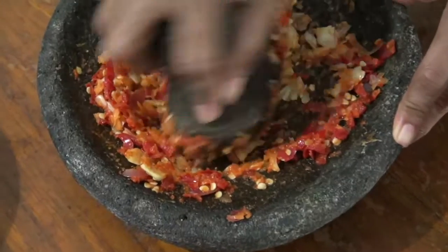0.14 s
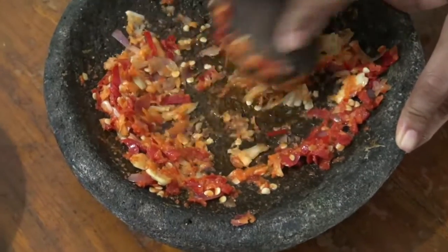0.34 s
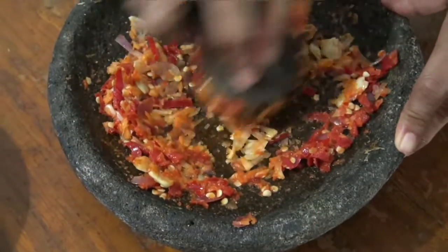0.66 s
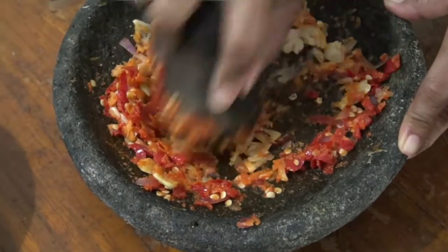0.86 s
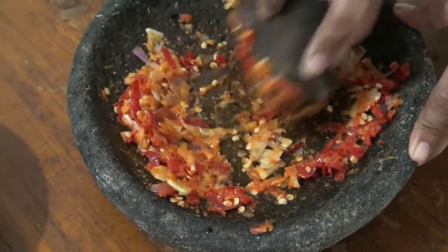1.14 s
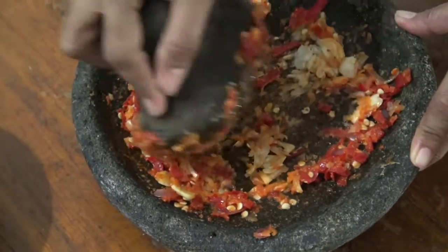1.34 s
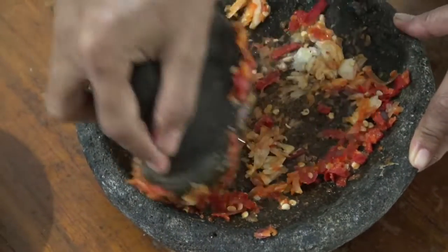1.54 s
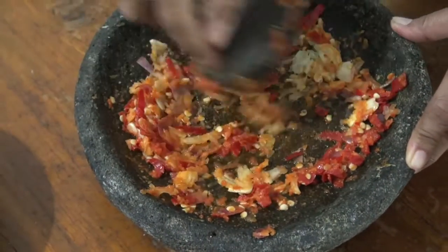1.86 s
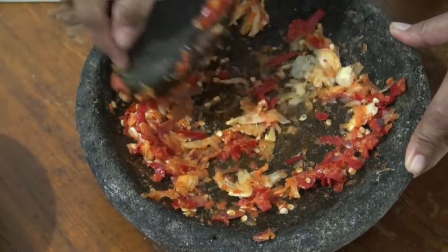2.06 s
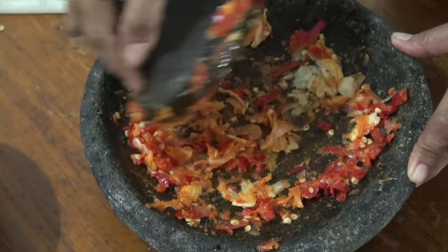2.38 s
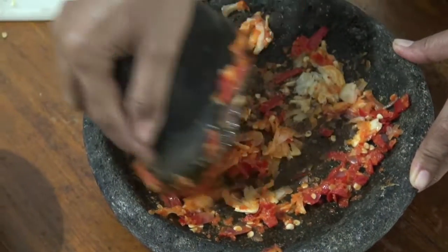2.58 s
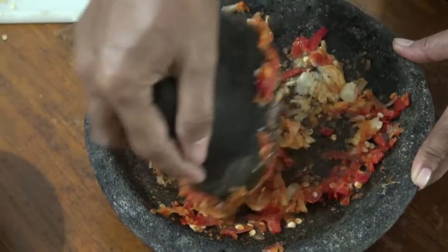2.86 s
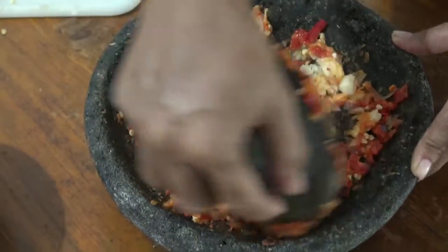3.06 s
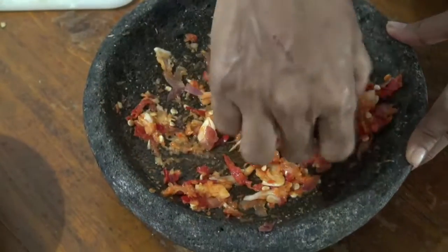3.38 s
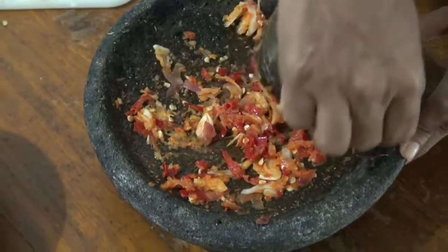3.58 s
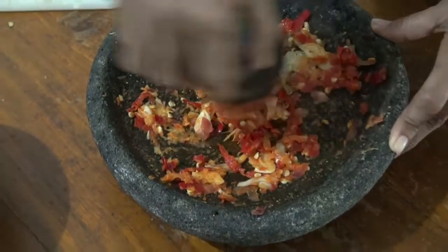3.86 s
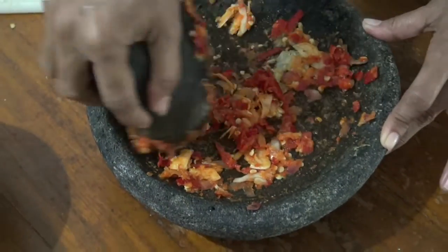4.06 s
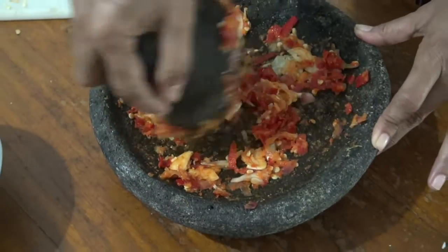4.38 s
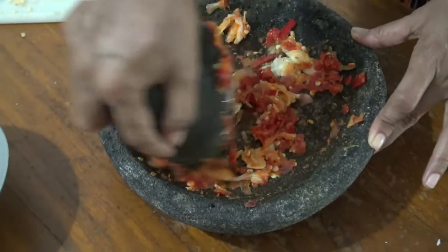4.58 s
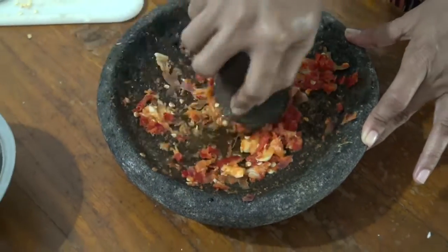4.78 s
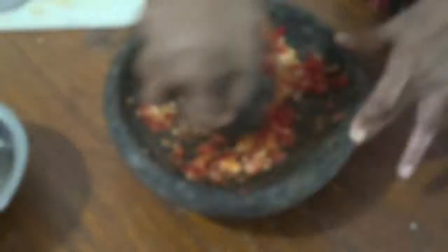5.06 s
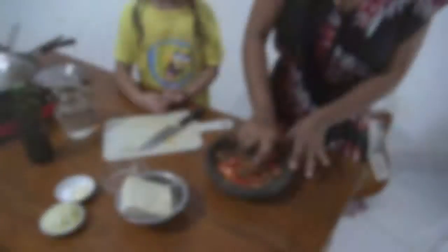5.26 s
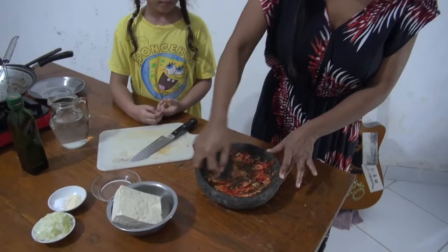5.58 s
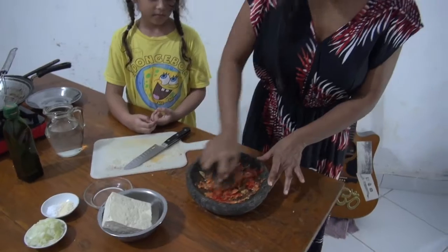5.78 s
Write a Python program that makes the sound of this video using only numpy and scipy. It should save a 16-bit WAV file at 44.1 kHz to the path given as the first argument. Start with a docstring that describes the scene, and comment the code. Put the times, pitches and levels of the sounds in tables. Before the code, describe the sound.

Sharp stone knocks, wet gritty crunching and short pestle clacks come in bursts as spice paste is ground in a reverberant tiled room.

```python
"""A hard knock and its bounces open the scene: a stone pestle works in a stone mortar on a wooden table.
Each blow is a noise chatter of some milliseconds, coloured as knock, thud and crack, that rings bowl modes.
Wet chilli, garlic and seeds crunch, snap and sizzle as coloured grains; stone rumbles; clacks ring the pestle.
Hard tiled walls add a long noise tail. A fan-like whirr, soft hiss and thin tones stay underneath."""
import sys
import numpy as np
from scipy import signal
from scipy.fft import rfft, irfft
from scipy.io import wavfile
from scipy.ndimage import uniform_filter1d

SR = 44100
rng = np.random.default_rng(int(sys.argv[2]) if len(sys.argv) > 2 else 0)


def generate_wav(signal):
    """Clip the signal to [-1, 1] and save it as 16-bit WAV at the path in sys.argv[1]."""
    frames = np.transpose(np.atleast_2d(signal))
    scaled = np.clip(frames, -1, 1) * 32767
    pcm = np.round(scaled).astype(np.int16)
    wavfile.write(sys.argv[1], SR, pcm)


N = 261160
FIRST_TOUCH_S, FIRST_TOUCH = 0.0005, 0.31  # first contact above the chatter: decay, relative height


def from_db(db):
    """Decibels to gain."""
    return 10 ** (np.asarray(db) / 20)


def rms_one(x):
    """Scale to rms 1."""
    return x / np.sqrt(np.mean(x ** 2) + 1e-20)


def at_hz(points, hz):
    """Read (Hz, value) rows on a log-frequency axis."""
    points = np.array(points)
    return np.interp(np.log(hz), np.log(points[:, 0]), points[:, 1])


def colour(x, spectrum):
    """Minimum-phase filter by the folded cepstrum; unit-energy taps keep the rms of white noise."""
    size = 2048
    hz = np.arange(size // 2 + 1) * SR / size + 10
    log_gain = at_hz(spectrum, hz) * np.log(10) / 20
    cepstrum = irfft(log_gain)
    cepstrum[1:size // 2] *= 2
    cepstrum[size // 2 + 1:] = 0
    taps = irfft(np.exp(rfft(cepstrum)))
    return signal.oaconvolve(x, taps / np.sqrt(np.sum(taps ** 2)))[:len(x)]


def drift(rate_hz):
    """Random wander: straight lines between normal draws of spread 1."""
    steps = rng.standard_normal(400)
    return np.interp(np.arange(N) / SR * rate_hz, np.arange(400), steps)


def ring(x, hz, t60_s):
    """One decaying mode as a two-pole resonator; a unit click rings with height about 1."""
    radius = from_db(-60 / (max(t60_s, .001) * SR))
    angle = 2 * np.pi * hz / SR
    return signal.lfilter([0, np.sin(angle)], [1, -2 * radius * np.cos(angle), radius ** 2], x + 1e-18)


def swell(x, hz, build_s, t60_s):
    """A mode fed by a shorter one builds up without a wide click; height about 1."""
    return ring(ring(x, hz, build_s), hz, t60_s) * 2 * np.log(1000) / (build_s * SR)


def soften(rings):
    """A contact lasts a fraction of a millisecond: band limits keep the ringing free of a wide click."""
    return signal.sosfilt(signal.butter(2, [1600, 12500], "band", fs=SR, output="sos"), rings)


def chatter(count, decay_s, touch):
    """Rough stone faces meet in a dying run of contacts; returns the run and its envelope's rms."""
    t = np.arange(count) / SR
    rise = np.minimum(t / 0.00013, 1)
    fall = np.exp(-t / max(decay_s, .0005)) + touch * np.exp(-t / FIRST_TOUCH_S)
    shape = rise * fall
    return rng.standard_normal(count) * shape, np.sqrt(np.mean(shape ** 2))


def grit(per_s, uneven_db):
    """Random clicks of very uneven size, rms 1."""
    sizes = from_db(uneven_db * np.minimum(rng.exponential(1, N), 5))
    signed = sizes * rng.choice([-1, 1], N)
    return rms_one(signed * (rng.random(N) < per_s / SR))


# Blows and bounces on the bowl. Each row: start in seconds, then relative levels in dB of
# knock, table thud, bright crack and bowl ring.
BLOWS = [(0.001, 1.5, -16, 0, -5), (0.019, -9, -34, -3, -27), (0.044, -10, -11, -6.5, -22),
         (0.069, -4, -18.5, -25, -38), (0.099, -13.5, -39, -10.5, -34), (0.378, -8.5, -16.5, -15.5, -51),
         (0.424, -44, -43, -27, -46), (0.76, -15.5, -30, -21, -46), (0.794, -14, -21.5, -19, -44),
         (0.83, -23.5, -17, -33, -50), (0.842, -12.5, -20.5, -22.5, -43), (1.182, -27, -26, -34, -57),
         (1.23, -26.5, -28.5, -34.5, -52), (1.697, -26, -25, -27.5, -53), (2.043, -11.5, -21.5, -12, -61),
         (2.065, -19, -13, -28, -52), (2.498, -3, -17, -8.5, -22), (2.505, -6, -18, -7.5, -20.5),
         (2.539, 0, -6, -23, -46), (2.552, -7.5, -38, -5, -27), (2.993, -60, -49, -35, -60),
         (3.009, -35, -30.5, -34, -59), (3.053, -6.5, -9, -5, -47), (3.077, -9.5, -28, -27, -39),
         (3.116, -9.5, -13, -14, -47), (3.129, -28, -9, -22, -41), (3.16, -15, -41, -23, -40),
         (3.236, -12, -19, -19, -49), (3.644, -41.5, -30, -39, -50), (4.041, -11, -21, -9.5, -46),
         (4.046, -5, -16, -14.5, -22), (4.068, -13.5, -51, -19, -36), (4.149, -19, -30, -28, -50),
         (4.157, -10, -12.5, -18, -40), (4.208, -30, -18, -38, -56), (4.505, -31, -29, -31, -57),
         (4.516, -24.5, -22, -31, -55), (4.546, -2, -9.5, -7.5, -45), (4.555, 0, -10, -30, -20),
         (4.579, -13, -7.5, -12.5, -44), (5.057, -30, -21, -37, -57), (5.202, -21.5, -23, -26.5, -58),
         (5.235, -26.5, -23.5, -46, -41), (5.262, -15, -21, -19.5, -40), (5.301, -19, -50, -24, -31),
         (5.515, 1.5, -10.5, -16, -14.5), (5.523, 1, -18, 1.5, -7), (5.551, -4, -9.5, -3, -32),
         (5.574, -4, -11, 0, -23), (5.6, -5.5, -17, -25, -28), (5.629, -18, -30, -9.5, -36),
         (5.89, -21.5, -25, -26, -46)]
# Spectra of stone knock, table thud and bright crack. Each row: frequency in Hz, relative density in dB per Hz.
KNOCK = [(300, -23), (600, -5), (800, 4), (1300, -1), (1700, -1.5), (2600, -8.5), (5000, -53.5),
         (15000, -97.5)]
THUD = [(100, -49), (150, -5.5), (200, -9.5), (330, 4.5), (580, 5), (800, 11.5), (1500, -30), (15000, -100)]
CRACK = [(100, -58.5), (800, -24), (1500, 5.5), (2200, 5.5), (3000, -3), (3800, -13), (5500, -24.5),
         (8000, -36.5), (15000, -68)]
# Bowl modes. Each row: frequency in Hz, relative level in dB, 60 dB decay in seconds.
BOWL = [(2150, -7, 0.21), (4470, -8, 0.12), (4890, -10, 0.019), (5600, -19, 0.076), (6850, -18, 0.03)]
BLOW_CHATTER_S = 0.0085
BOUNCE_WITHIN_S = 0.06  # a blow this soon after another is a bounce
BOUNCE_CHATTER_S, BOUNCE_TOUCH = 0.011, 0.033  # a bounce skids: longer chatter, hardly any first contact


def blows():
    """One chatter sounds as knock, thud and crack, its start rings the bowl; returns close and room feeds."""
    count = 4000
    close, far, strikes = np.zeros((3, N + count))
    gaps_s = np.diff([row[0] for row in BLOWS], prepend=-1)
    for (s, knock_db, thud_db, crack_db, bowl_db), gap_s in zip(BLOWS, gaps_s):
        bounce = gap_s < BOUNCE_WITHIN_S
        contact = (BOUNCE_CHATTER_S, BOUNCE_TOUCH) if bounce else (BLOW_CHATTER_S, FIRST_TOUCH)
        at = round(s * SR)
        rough, size = chatter(count, *contact)
        parts = (KNOCK, knock_db), (THUD, thud_db), (CRACK, crack_db)
        blow = size * sum(from_db(db) * rms_one(colour(rough, spectrum)) for spectrum, db in parts)
        close[at:at + count] += blow
        # heavy blows shake the whole table top, which fills the room more
        far[at:at + count] += from_db(-4.5 + 0.2 * knock_db) * blow
        strikes[at] = from_db(bowl_db)
    modes = sum(from_db(db) * swell(strikes, hz, 0.0033, t60_s) for hz, db, t60_s in BOWL)
    rings = soften(modes)
    return (close + rings)[:N], (far + from_db(-2.5) * rings)[:N]


# Room decay. Each row: frequency in Hz, 60 dB decay in seconds.
ROOM = [(125, 0.59), (250, 0.23), (500, 0.59), (1000, 0.75), (2000, 0.72), (4000, 0.75), (8000, 0.54),
        (14000, 0.24)]


def walls(x):
    """Dense echoes build up in a few ms, die band by band; a new pattern each half second as the pestle moves."""
    t, step = np.arange(SR) / SR, SR // 2
    edges_hz = np.geomspace(70, 18000, 13)
    white = rng.standard_normal((2, N // step + 1, SR))
    tails = 0
    for k, (low, high) in enumerate(zip(edges_hz, edges_hz[1:])):
        band = signal.sosfilt(signal.butter(2, [low, high], "band", fs=SR, output="sos"), white[k % 2])
        t60_s = at_hz(ROOM, np.sqrt(low * high))
        tails = tails + band * from_db(-60 * t / t60_s)
    tails = tails * np.clip((t - .006) / 0.004, 0, 1)
    out = np.zeros(N + 2 * SR)
    for k, tail in enumerate(tails):
        start = k * step
        echo = signal.fftconvolve(x[start:start + step], tail / np.sqrt(np.sum(tail ** 2)))
        out[start:start + len(echo)] += echo
    return out[:N]


# Hiss spectrum. Each row: frequency in Hz, relative density in dB per Hz.
AIR = [(25, -23), (50, -9), (100, -5.5), (150, -1.5), (250, -2.5), (500, -4.5), (800, -25), (1400, -10),
       (2400, -17), (3200, -15), (5000, -18), (8000, -20.5), (12000, -31.5), (15700, -24)]
# Whirr resonances. Each row: centre in Hz, width in Hz, rms level in dB.
WHIRR = [(567.5, 36, -54), (1104, 40, -62.5), (1122, 95, -48.5)]
# Thin steady tones. Each row: frequency in Hz, peak level in dB.
WHINE = [(9152, -79), (12000, -86), (13700, -77), (15000, -95)]
AIR_DB = -52.5


def background():
    """Soft coloured hiss, air whirring as noise in a few resonances, and thin high sines."""
    out = from_db(AIR_DB) * colour(rng.standard_normal(N), AIR)
    for hz, width_hz, db in WHIRR:
        edges_hz = [hz - width_hz / 2, hz + width_hz / 2]
        band = signal.butter(2, edges_hz, "band", fs=SR, output="sos")
        out += from_db(db) * rms_one(signal.sosfilt(band, rng.standard_normal(N)))
    for hz, db in WHINE:
        out += from_db(db) * np.sin(2 * np.pi * hz * np.arange(N) / SR)
    return out


# Strokes of the pestle through the paste. Each row: hardest moment, build-up and easing-off in seconds,
# then relative levels in dB of wet crunch, sizzle of juice and stone rumble.
STROKES = [(0.085, 0.12, 0.23, -29, -44, -49), (0.311, 0.07, 0.072, -29, -43.5, -44),
           (0.405, 0.031, 0.27, -29.5, -50, -51), (0.691, .13, 0.066, -33, -43, -54.5),
           (0.79, 0.05, 0.27, -29, -44, -31), (1.049, 0.15, 0.11, -30.5, -44, -44),
           (1.17, 0.086, 0.17, -36, -42, -42.5), (1.245, 0.14, 0.12, -49, -72, -43.5),
           (1.65, 0.13, 0.17, -35.5, -47, -47), (2.135, 0.11, 0.21, -38.5, -48, -35.5),
           (2.545, 0.014, 0.27, -35, -70, -55), (3.08, .12, 0.21, -40.5, -49, -30),
           (3.21, 0.18, 0.22, -38, -45.5, -27.5), (3.592, 0.017, 0.31, -41, -50, -52),
           (4.12, 0.07, 0.24, -40.5, -58, -35), (4.56, 0.03, 0.24, -34, -54, -34),
           (4.67, 0.07, 0.053, -36, -59, -34), (4.81, .1, 0.17, -45.5, -51, -45),
           (4.855, 0.015, 0.037, -42.5, -64, -45), (5.085, 0.012, 0.065, -45, -73, -41),
           (5.13, .03, 0.013, -35, -69, -42), (5.205, 0.029, 0.024, -39, -60, -48),
           (5.28, .25, 0.29, -38, -59, -35), (5.64, 0.16, 0.16, -35, -57, -56),
           (5.75, 0.037, 0.22, -34.5, -61, -47)]
STROKE_SWING_DB = 26.5  # crunch changes this much per build-up or easing-off time
SIZZLE_SWING, RUMBLE_SWING = 2.34, 0.92  # ratios to the crunch's swing
RESTING_DB = -80.5, -65.5, -53  # crunch, sizzle, rumble while the pestle only leans on the paste


def strokes():
    """Every stroke swells to its hardest moment and eases off; returns gains of crunch, sizzle and rumble."""
    t = np.arange(N) / SR
    gains = from_db(RESTING_DB)[:, None] * np.ones(N)
    swing_db = STROKE_SWING_DB * np.array([[1], [SIZZLE_SWING], [RUMBLE_SWING]])
    for s, build_s, ease_s, *levels_db in STROKES:
        away = np.where(t < s, (s - t) / max(build_s, .005), (t - s) / max(ease_s, .005))
        gains += from_db(np.array(levels_db)[:, None] - swing_db * away)
    return gains


SMALL_SNAPS_PER_S, SMALL_SNAPS_DB, SMALL_SNAPS_UNEVEN_DB = 350, -4.5, 2.8  # dB: relative to the crunch


def small_snaps():
    """Sparse clicks, each ringing a few cycles at one of a dozen pitches; rms 1."""
    clicks = grit(SMALL_SNAPS_PER_S, SMALL_SNAPS_UNEVEN_DB)
    dealt = rng.integers(0, 12, N)
    pitches_hz = np.geomspace(2600, 7000, num=12)
    rings = (swell(clicks * (dealt == k), hz, 6.2 / hz, 17.0 / hz) for k, hz in enumerate(pitches_hz))
    return rms_one(sum(rings))


# Spectra of wet crunch, juice sizzle and stone rumble. Each row: frequency in Hz, relative density in dB per Hz.
CRUNCH = [(900, -11), (1500, -9), (2300, -1), (3400, -3), (5000, 1), (6600, -4), (9000, -11), (11000, -27),
          (15000, -39)]
SIZZLE = [(6000, -44), (9500, -4), (11500, -1.5), (13500, -8), (15700, -5)]
RUMBLE = [(100, -10), (200, 3.5), (500, 2.5), (1000, 7), (2000, -9), (4000, -30.5), (15000, -57)]


def drag():
    """Paste and seeds crunch in clumps under the pestle while stone rumbles on stone."""
    crunch_gain, sizzle_gain, rumble_gain = strokes()
    grains = grit(3500, 1.77) * from_db(2.42 * drift(65.))
    bumps = grit(2500, 2.33) * from_db(2.6 * drift(40.))
    crunch = colour(grains, CRUNCH) + from_db(SMALL_SNAPS_DB) * small_snaps()
    sizzle, rumble = colour(grains, SIZZLE), colour(bumps, RUMBLE)
    return crunch_gain * crunch + sizzle_gain * sizzle + rumble_gain * rumble


# Loudest seeds and skins snapping. Each row: start in seconds, relative peak in dB, pitch in Hz.
SNAPS = [(0.0337, 0, 4470), (0.082, 0, 4000), (0.0897, -13, 3080), (0.131, -11, 4500), (0.2706, -11, 4560),
         (0.295, -10.5, 4354), (0.3152, -3.5, 5700), (0.392, -12, 4740), (0.424, -7, 3080),
         (0.4454, -12, 3570), (0.455, -11, 2650), (0.5058, -17.5, 5640), (0.623, -20, 4890),
         (0.643, -19, 4860), (0.667, -23, 4440), (0.697, -21, 3780), (0.7677, -19, 4400),
         (0.7944, -5, 3300), (0.8668, -10, 3270), (0.916, -13.5, 3700), (0.983, -17, 4340),
         (1.0177, -17, 4760), (1.043, -27, 4490), (1.052, -13, 5110), (1.07, -16, 2600), (1.078, -20, 4800),
         (1.161, -15.5, 4890), (1.17, -19, 8500), (1.239, -19, 3940), (1.253, -12.5, 4770),
         (1.6077, -30, 4910), (1.642, -15, 6800), (1.6636, -21, 7160), (1.6896, -23, 5190),
         (2.5012, -14, 4470), (2.599, -27, 7500), (3.5758, -27, 9900), (3.6007, -37, 6600),
         (4.04, -17.5, 9400), (4.129, -21, 7500), (4.6574, -11.5, 4830), (4.677, -20.5, 5000),
         (4.785, -23.5, 4090), (4.81, -16, 4070), (5.0824, -27, 6600), (5.128, -28, 4040),
         (5.1683, -21, 5600), (5.203, -22, 4460), (5.2675, -22, 6870), (5.676, -16.5, 4450),
         (5.7482, -20, 6660), (5.77, -15.5, 3250)]


def snaps():
    """Each snap is a few cycles at its own pitch plus a wide crack."""
    count = 400
    out, t = np.zeros(N + count), np.arange(count) / SR
    cracks = rng.standard_normal((len(SNAPS), count))
    for (s, db, hz), crack in zip(SNAPS, cracks):
        at = round(s * SR)
        pitched = 0.12 * ring(crack * np.exp(-t / 0.0023), hz, 5.5 / hz)
        snap = pitched + 0.34 * crack * np.exp(-t / 0.00018)
        out[at:at + count] += from_db(db) * snap / np.abs(snap).max()
    return signal.sosfilt(signal.butter(3, [1800, 9000], "band", fs=SR, output="sos"), out[:N])


def clear_ring(x, modes):
    """Swelling modes, each set by rms, with little sound between them."""
    return sum(from_db(db) * rms_one(swell(x, hz, 0.0035, t60_s)) for hz, db, t60_s in modes)


# Glancing clacks. Each row: start in seconds, relative peak of the lowest modes in dB,
# peak of the upper modes against the lowest in dB.
CLACKS = [(1.514, -40, 1), (1.623, -33, -9), (2.036, -17.5, -13), (2.042, -12, -18), (2.049, -17, -25),
          (2.056, -11, -21), (2.068, -9, -21), (2.075, -27, -24), (2.992, -35.5, 0.5), (3.035, -29, -29),
          (3.052, -0.5, -11), (3.066, -7, -29), (3.076, -11, -5), (3.088, -13, -9), (3.098, -4, -21),
          (3.117, -11.5, -14), (3.139, -22, -2), (3.156, -14, -15), (3.198, -22, -13), (3.229, -18, -18),
          (3.499, -34, -11), (3.561, -43, -25), (3.643, -32, -18), (4.48, -35, -28.5), (5.055, -36, -22.5),
          (5.128, -35, -9), (5.24, -33, -21)]
# Pestle modes, the first three the lowest. Each row: frequency in Hz, relative level in dB, 60 dB decay in seconds.
PESTLE = [(2326, -7, 0.036), (2388, 7, 0.065), (2387, -19.5, .025), (4140, -9, 0.028), (4930, 5, 0.016),
          (7670, -4, 0.015), (10500, -23, 0.03), (12100, -31, .025), (13320, -26, .02)]
CLACK_CHATTER_S = 0.0065


def clacks():
    """A short chatter rings the pestle; sharper contacts reach its upper modes more."""
    count = 3000
    out = np.zeros(N + count)
    for s, db, upper_db in CLACKS:
        at = round(s * SR)
        rough, _ = chatter(count, CLACK_CHATTER_S, FIRST_TOUCH)
        lowest = clear_ring(rough, PESTLE[:3])
        upper = clear_ring(rough, PESTLE[3:])
        both = lowest / np.abs(lowest).max() + from_db(upper_db) * upper / np.abs(upper).max()
        out[at:at + count] += from_db(db) * both
    return soften(out[:N])


# Dish modes. Each row: frequency in Hz, relative level in dB, 60 dB decay in seconds.
DISH = [(4090, -34.5, 0.41), (7020, -47, .25), (7100, -47, .25)]
DISH_S = 4.15


def dish():
    """A jolted dish rings once: one unit click into a few clear modes."""
    jolt = 1. * (np.arange(N) == round(DISH_S * SR))
    return soften(sum(from_db(db) * ring(jolt, hz, t60_s) for hz, db, t60_s in DISH))


def scene():
    """Blows fill the room more than the small close crunch does; small stones radiate little bass."""
    close, far = blows()
    pestle = clacks() + dish()
    crush = snaps() + drag()
    room = walls(far + from_db(-14) * pestle + from_db(-14) * crush)
    stone = close + pestle + crush + room
    stone = signal.sosfilt(signal.butter(4, 125, "high", fs=SR, output="sos"), stone)
    return (stone + background())[None]


CUTOFF_HZ = 15900


def record(dry):
    """A limiter holds the loudest blows down and lets go over about a tenth of a second; the top is cut."""
    ramp_db = 90 * np.arange(N) / SR
    over_db = np.maximum(20 * np.log10(np.abs(dry[0]) + 1e-9) + 1.53, 0)
    held_db = 0.88 * (np.maximum.accumulate(over_db + ramp_db) - ramp_db)
    smooth_db = uniform_filter1d(held_db, size=121)
    limited = np.clip(dry * from_db(-smooth_db), -.98, .98)
    return signal.sosfilt(signal.cheby2(14, 60, CUTOFF_HZ, fs=SR, output="sos"), limited)


dry = scene()
out = record(dry)
generate_wav(out)
```